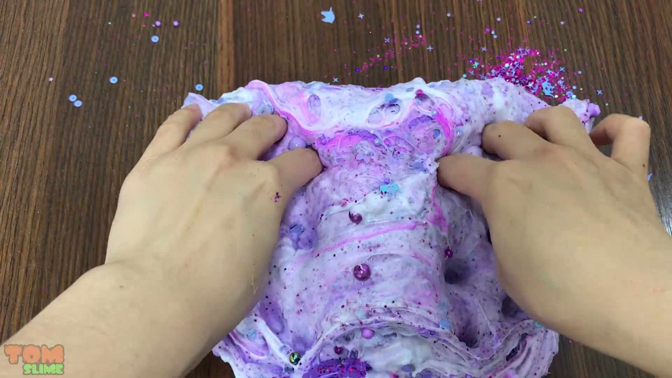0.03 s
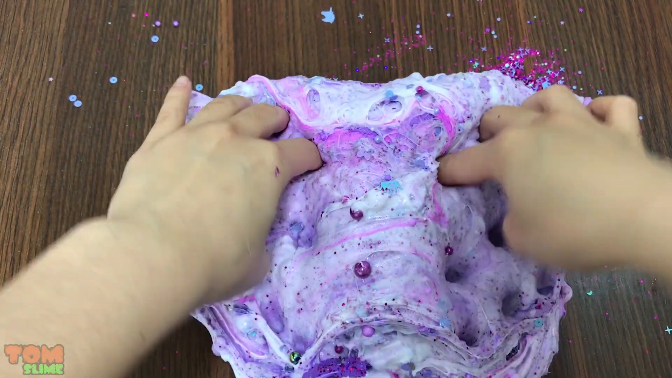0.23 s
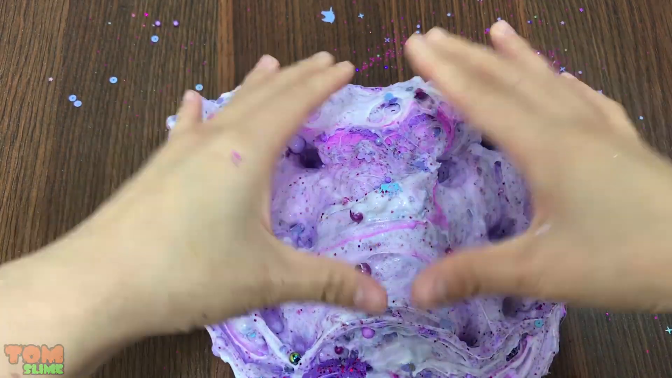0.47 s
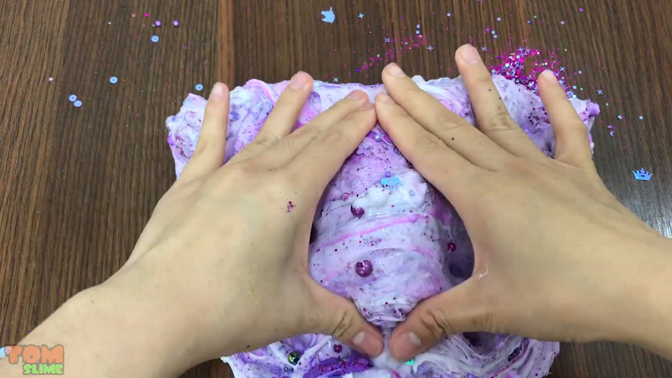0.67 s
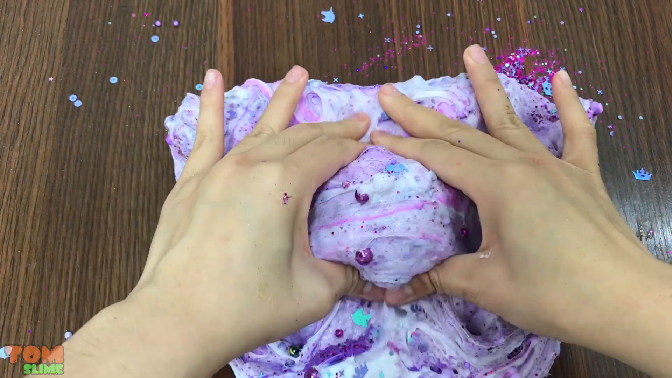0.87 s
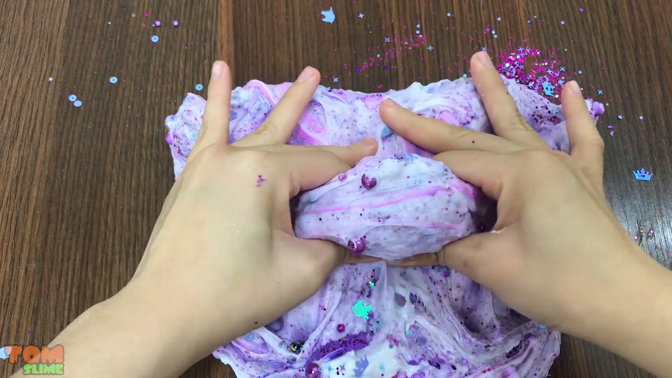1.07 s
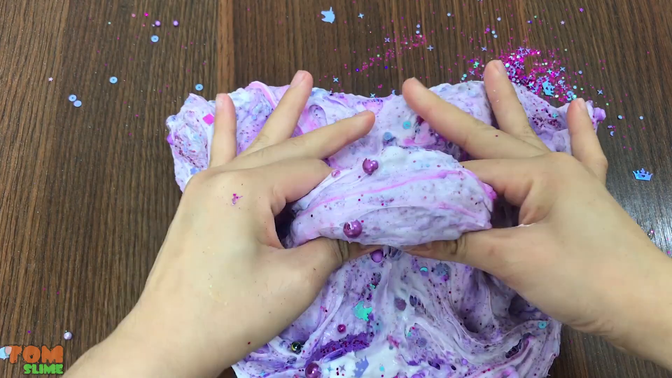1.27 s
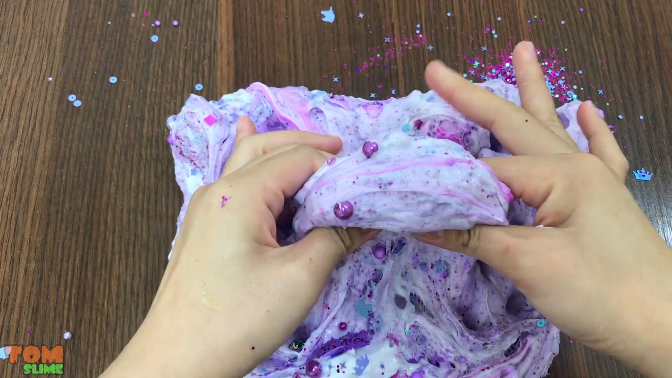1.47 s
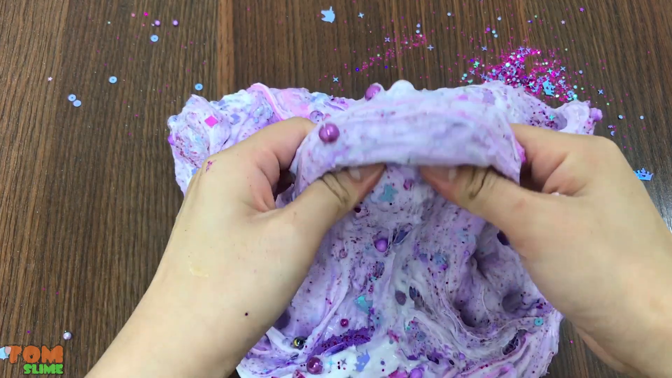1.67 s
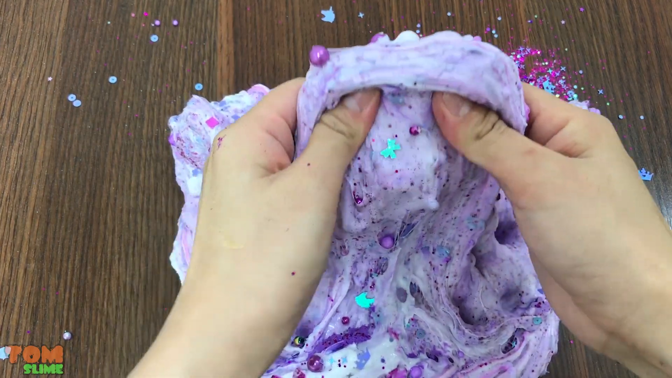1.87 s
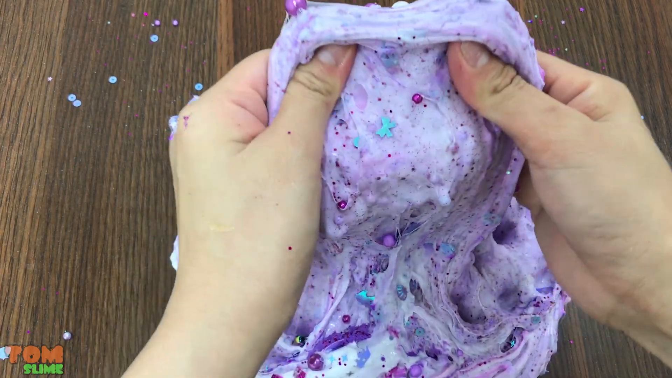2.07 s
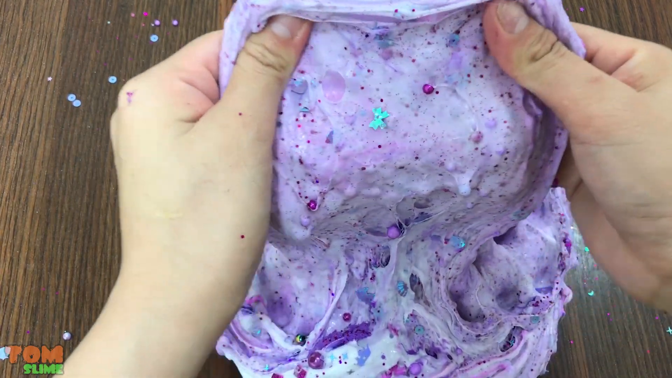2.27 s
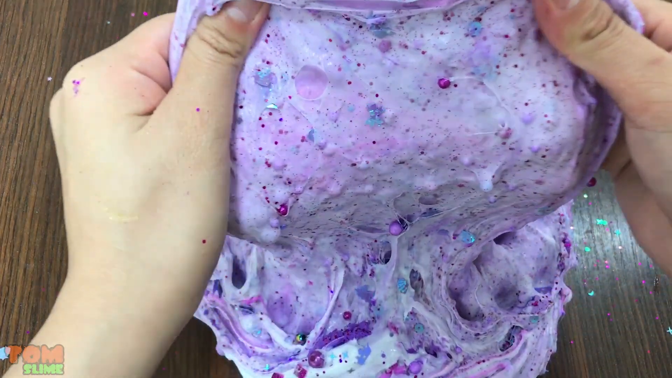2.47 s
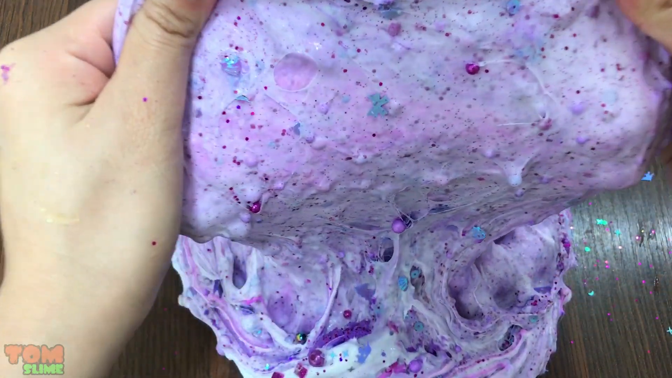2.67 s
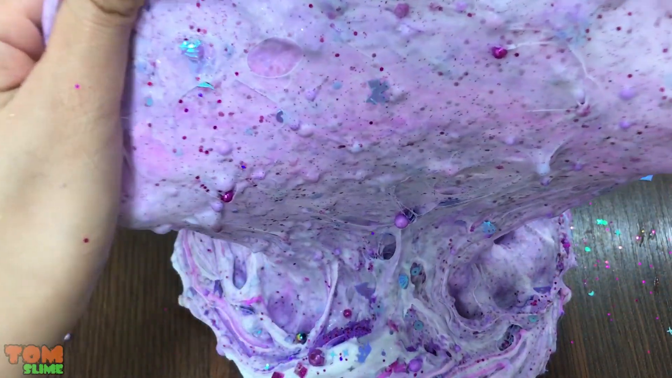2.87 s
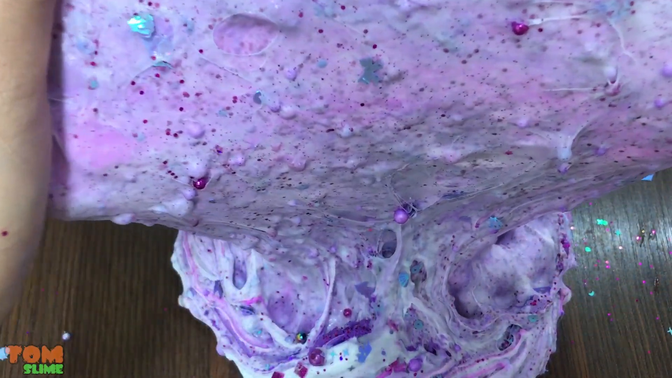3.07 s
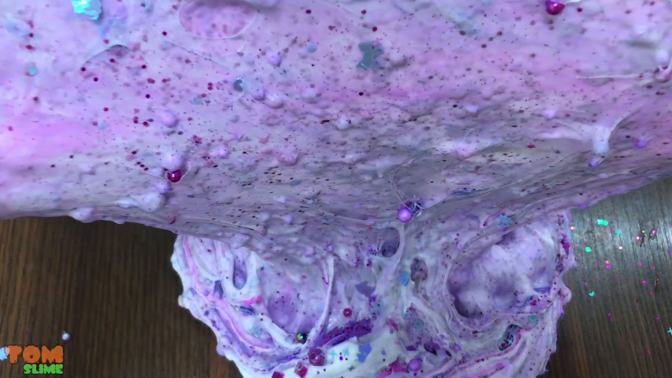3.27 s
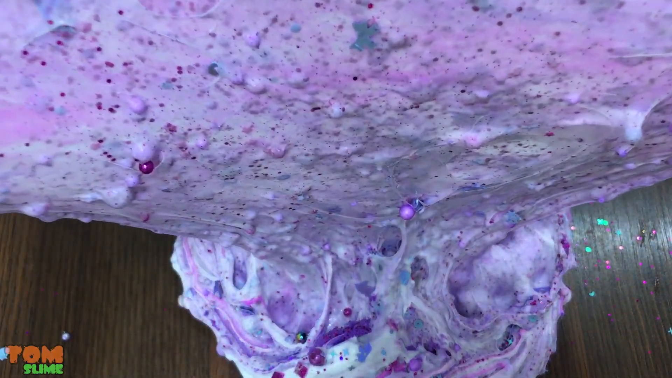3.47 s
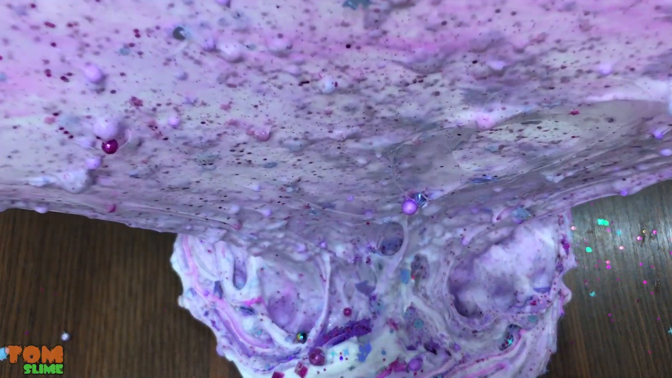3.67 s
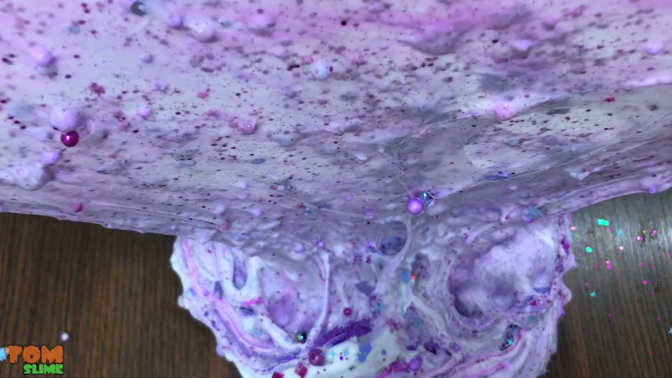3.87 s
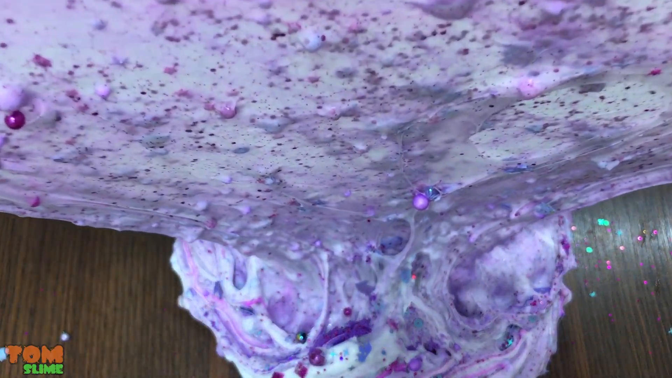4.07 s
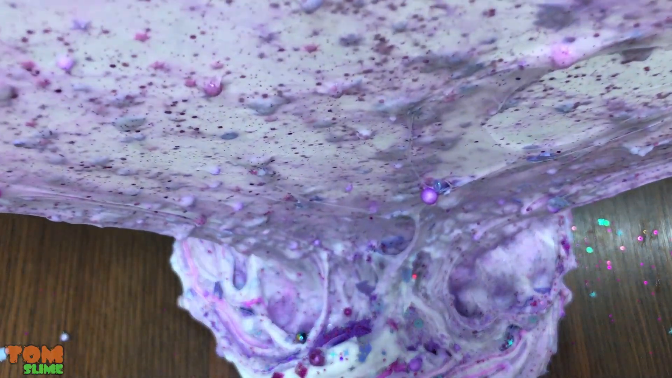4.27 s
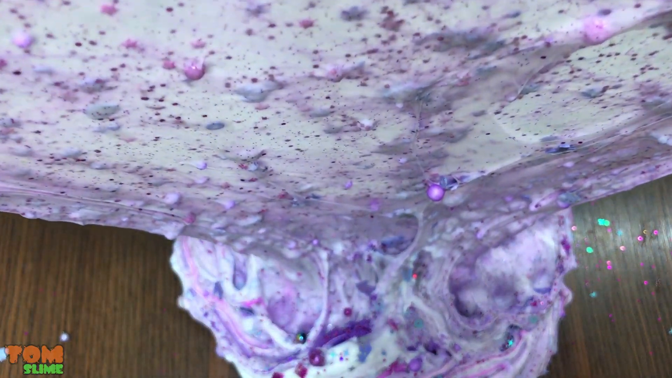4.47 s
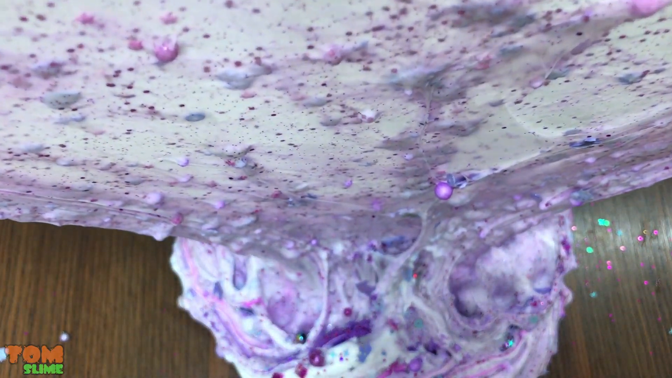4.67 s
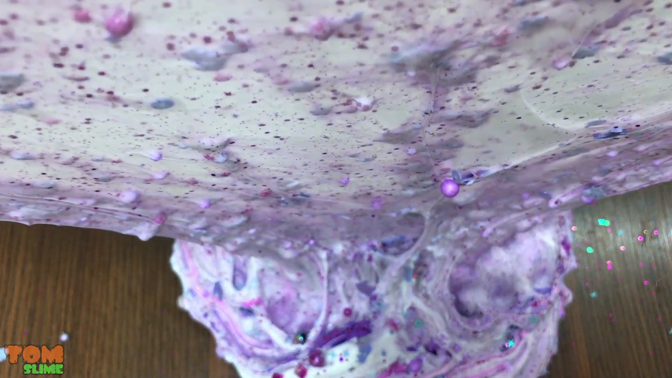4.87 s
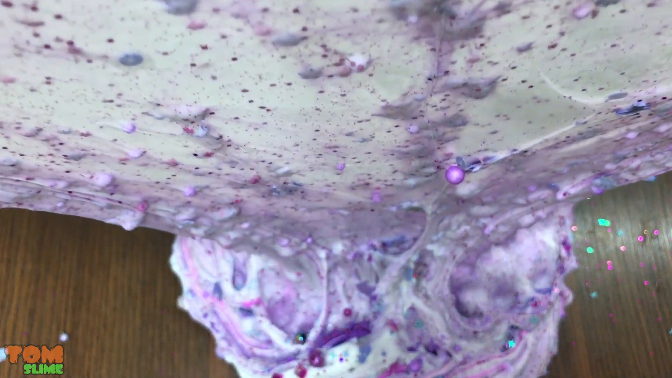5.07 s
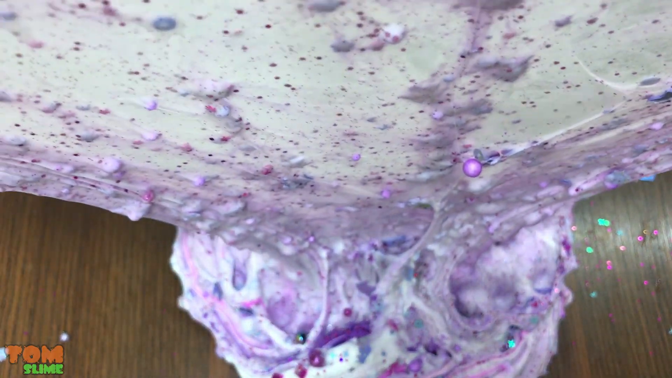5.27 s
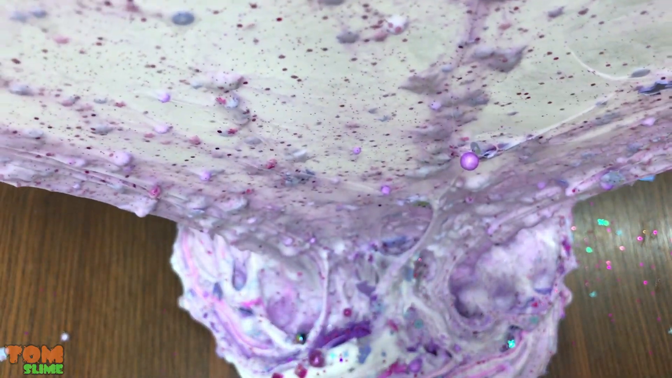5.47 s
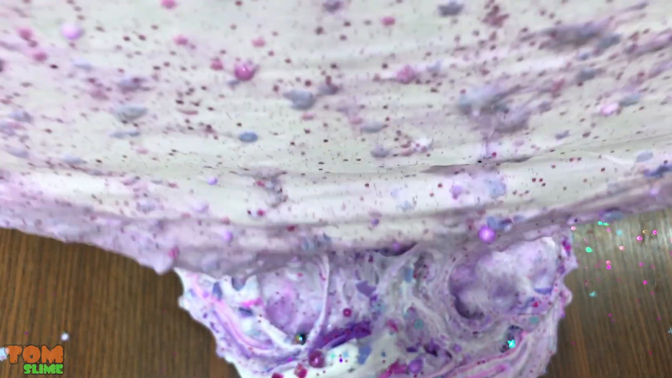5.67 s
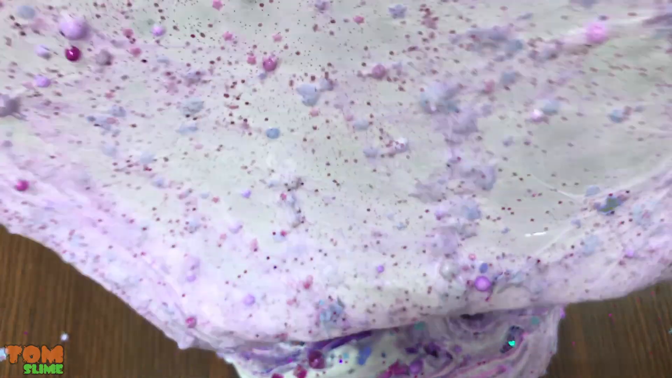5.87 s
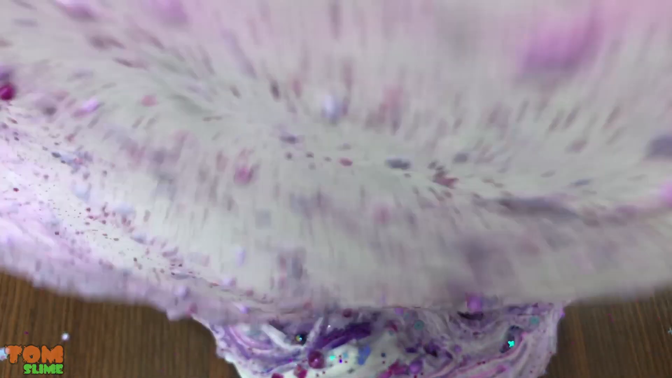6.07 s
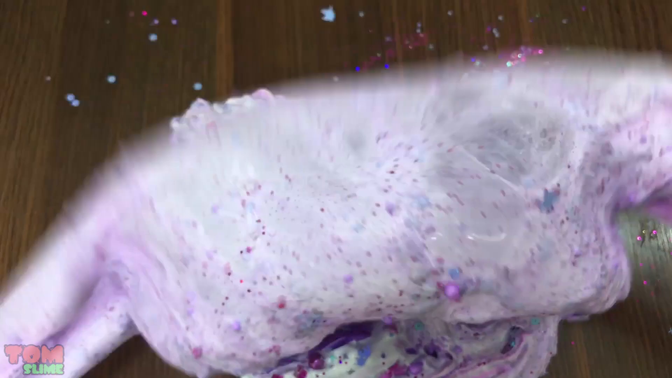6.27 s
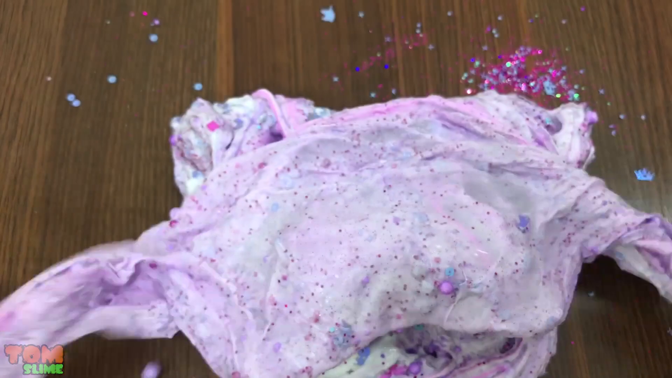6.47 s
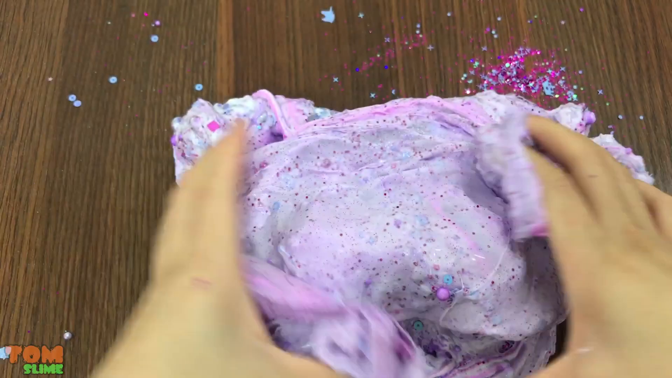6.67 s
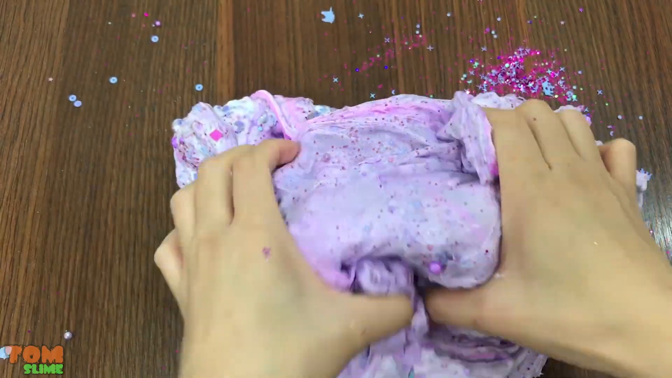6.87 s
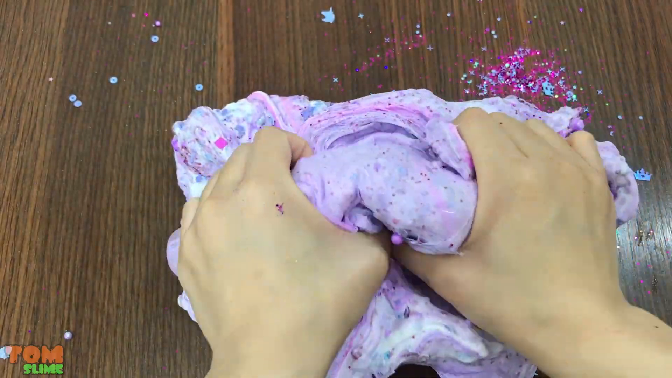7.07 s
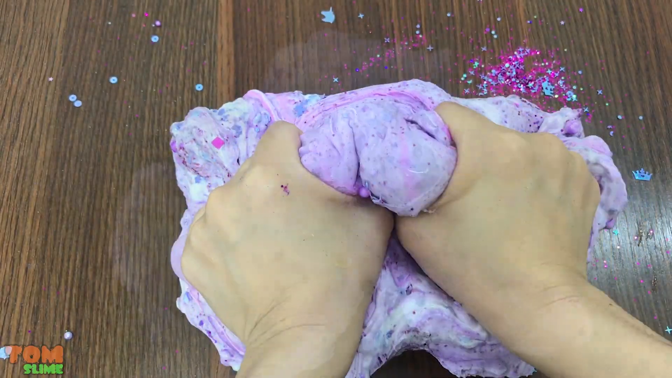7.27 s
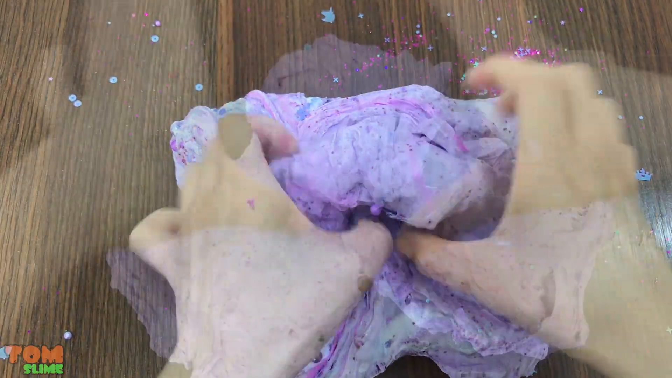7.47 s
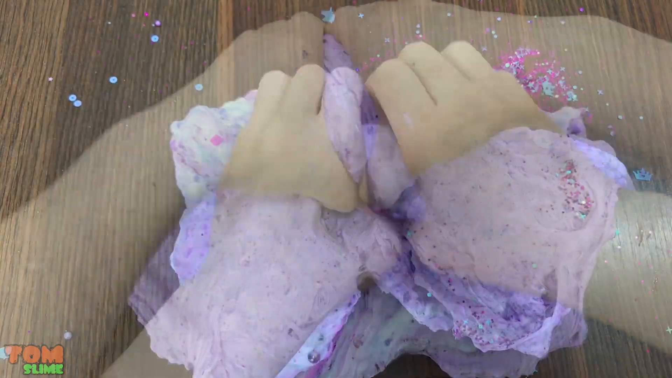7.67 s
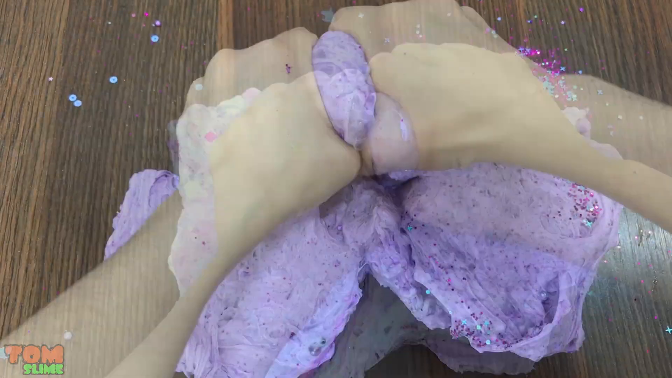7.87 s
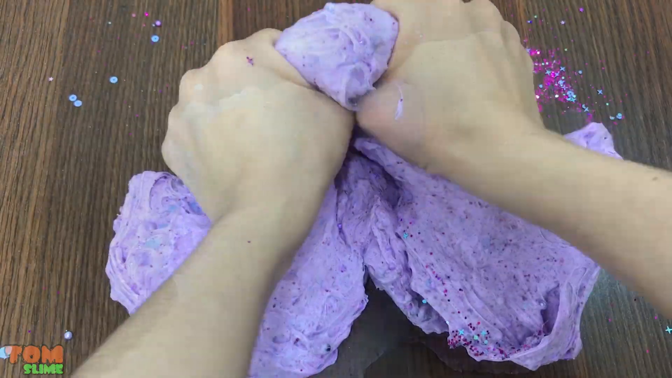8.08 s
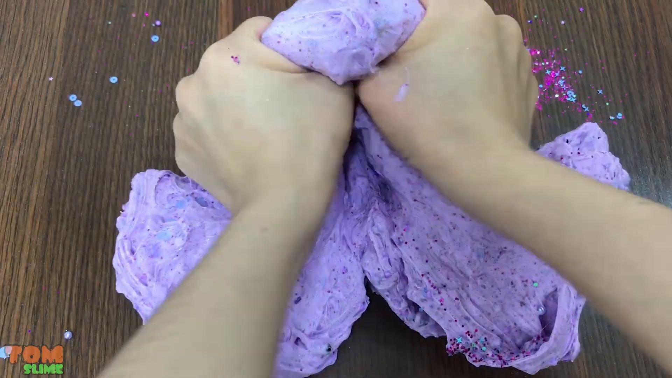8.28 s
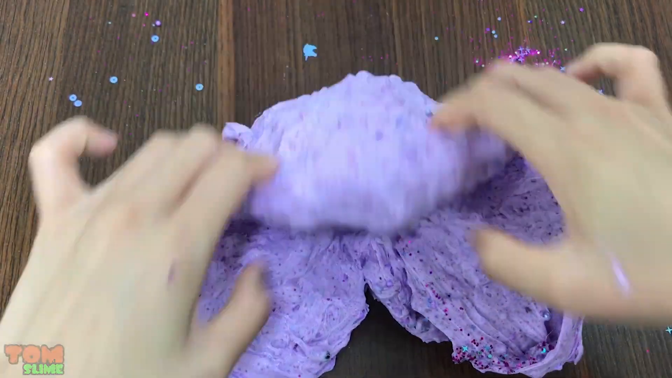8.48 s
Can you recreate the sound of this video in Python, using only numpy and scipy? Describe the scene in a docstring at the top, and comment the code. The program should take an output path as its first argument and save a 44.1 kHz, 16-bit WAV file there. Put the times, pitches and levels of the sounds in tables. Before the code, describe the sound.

Close-up slime squeezing with fine bubble crackle, a quiet stretch, a swishing drop with a heavy thud, then sharp squelchy popping.

```python
"""Kneading sticky slime

Hands squeeze, stretch and fold a big lump of slime on a wooden table, close to the microphone in a small room.
Air pockets burst as a torn film plus a ringing cavity; tiny bubbles crackle as clumped, pitched clicks.
Fingers squelch through coloured bubble noise; low thumps and bumps ring the table's low modes.
Pulled into a thin sheet the slime falls almost silent, amid soft low rustles, perhaps of clothing or a chair;
then it swishes down and is squeezed until the trapped air pops."""
import sys
import numpy as np
from scipy import signal
from scipy.fft import rfft, irfft, next_fast_len
from scipy.io import wavfile
from scipy.ndimage import uniform_filter1d

SR = 44100
rng = np.random.default_rng(int(sys.argv[2]) if len(sys.argv) > 2 else 0)


def unload_wav(signal):
    """Save mono or channel-first audio to the path in sys.argv[1] as 16-bit WAV at rate SR, clipped to [-1, 1]."""
    wavfile.write(
        sys.argv[1],
        SR,
        np.round(np.clip(np.atleast_2d(signal).T, -1, 1) * 32767).astype(np.int16),
    )


N = 375732   # samples


def from_db(db):
    """Amplitude gain from decibels."""
    return 10 ** (np.asarray(db) / 20)


def rms_one(x):
    """Normalise the mean power: scale to rms 1."""
    return x / np.sqrt(np.mean(x ** 2) + 1e-20)


def unit_energy(x):
    """Normalise the total energy to that of a unit click."""
    return x / np.sqrt(np.sum(x ** 2) + 1e-20)


def in_time(rows):
    """Linear interpolation in time: one curve for each column after the first."""
    s, *columns = np.transpose(rows)
    return [np.interp(np.arange(N) / SR, s, column) for column in columns]


def at_hz(points, hz):
    """Interpolation on a log-frequency axis."""
    f, value = np.transpose(points)
    return np.interp(np.log(np.maximum(hz, 1)), np.log(f), value)


def add(out, start_s, sound):
    """Superposition: mix a sound in at its start time."""
    i = max(round(start_s * SR), 0)
    out[i:i + len(sound)] += sound[:N - i]


def drift(knots_per_s):
    """Slow random modulation: interpolated Gaussian knots, rms 1."""
    knots = rng.standard_normal(N // 40)
    return rms_one(np.interp(np.arange(N) / SR * knots_per_s, np.arange(len(knots)), knots))


def resonate(x, hz, q):
    """Damped resonance: a two-pole band-pass with gain 1 at its peak."""
    w = 2 * np.pi * min(hz, .45 * SR) / SR
    a = np.sin(w) / (2 * max(q, .2))
    return signal.lfilter([a, 0, -a], [1 + a, -2 * np.cos(w), 1 - a], x + 1e-18)


def colour(x, spectrum):
    """Causal minimum-phase filtering: folding the cepstrum onto positive time gives the phase; rms 1."""
    size = 2 * next_fast_len(N // 2 + 4096)
    gain = from_db(at_hz(spectrum, np.arange(size // 2 + 1) * SR / size))
    cepstrum = irfft(np.log(gain))
    cepstrum[size // 2:] = 0
    response = np.exp(2 * rfft(cepstrum))
    return rms_one(irfft(rfft(x, size) * response)[:N])


def hiss(spectrum):
    """Stationary coloured noise, rms 1."""
    return colour(rng.standard_normal(N), spectrum)


def swells(rows, rise_db_per_s, fall_db_per_s):
    """Incoherent addition of gestures (start_s, hold_s, level_db) that rise up to start_s, hold and fade."""
    t, power = np.arange(N) / SR, 1e-14
    for start_s, hold_s, level_db in rows:
        before = rise_db_per_s * np.maximum(start_s - t, 0)
        after = fall_db_per_s * np.maximum(t - start_s - hold_s, 0)
        power = power + from_db(level_db - np.minimum(before + after, 100)) ** 2
    return np.sqrt(power)


def microbubbles(per_s, spread_db, clump_db, low_hz, high_hz, q, snap):
    """Clustered random arrivals: each tiny bubble bursts with a snap and rings at one of 20 pitches."""
    chance = per_s * from_db(clump_db * drift(70)) / SR
    born = rng.random(N) < chance
    loudness = from_db(spread_db * np.minimum(rng.exponential(1, N), 4))
    clicks = born * loudness * rng.choice([-1, 1], N)
    pitches = np.geomspace(low_hz, high_hz, 20)
    dealt = rng.integers(0, len(pitches), N)
    rings = rms_one(sum(resonate(clicks * (dealt == k), hz, q) for k, hz in enumerate(pitches)))
    grains = rings + snap * rms_one(clicks)
    # even out the level over about 70 ms, so that only the texture is left
    return grains / np.sqrt(uniform_filter1d(grains ** 2, size=3000) + 1e-6)


# Shape of the background hiss and rumble. Columns: frequency_hz, relative_db_per_hz
FLOOR_SPECTRUM = [(15, -37), (25, 13), (59, -0.5), (166, -2), (531, -10), (1290, -14.5), (4250, -20.5),
                  (5140, -22.5), (6210, -21), (11000, -27), (12500, -24), (16000, -23.5)]


def background(level_db=-64.5):
    """Stationary noise: a faint hiss over a stronger low rumble."""
    return from_db(level_db) * hiss(FLOOR_SPECTRUM)


# Decay of the room. Columns: frequency_hz, t60_s
REVERB_TIME = [(150, 0.84), (530, .5), (1400, 0.72), (3700, 0.51), (9700, 0.67), (16000, 0.1)]
# Strength of the room's echo. Columns: frequency_hz, level_db
REVERB_LEVEL = [(100, -15.5), (400, -5), (1400, -7.5), (3700, -6.5), (7000, -9.5), (11000, -9.5),
                (16000, -18)]


def room(x, build_s=0.00057):
    """Diffuse reverberation: noise bands decay exponentially, the highest treble fastest."""
    t = np.arange(SR * 3 // 4) / SR
    edges = np.geomspace(60, 17000, 13)
    white, response = rng.standard_normal((2, len(t))), 0
    for k, (low, high) in enumerate(zip(edges, edges[1:])):
        hz = np.sqrt(low * high)
        # neighbouring bands draw on different noise
        band = signal.sosfilt(signal.butter(2, [low, high], "band", fs=SR, output="sos"), white[k % 2])
        decay = from_db(-60 * t / at_hz(REVERB_TIME, hz))
        tail = unit_energy(band * decay * (1 - np.exp(-t / build_s)))
        share = np.sqrt(2 * (high - low) / SR)   # of white noise in this band
        response = response + from_db(at_hz(REVERB_LEVEL, hz)) * share * tail
    return signal.fftconvolve(x, response)[:N]


def near_scatter(x, level_db=-9.0, spread_s=0.0016, lowest_hz=1500):
    """Early scattering: hands and table throw the short waves back within a few milliseconds."""
    t = np.arange(2048) / SR
    bounces = unit_energy(rng.standard_normal(len(t)) * t * np.exp(-2 * t / spread_s))
    bounces = signal.sosfilt(signal.butter(2, lowest_hz, "high", fs=SR, output="sos"), bounces)
    return from_db(level_db) * signal.fftconvolve(x, bounces)[:N]


# Dull noise of moving hands. Columns: frequency_hz, relative_db_per_hz
SHUFFLE_SPECTRUM = [(25, -9), (55, 7), (100, -3), (170, -5.5), (300, -5), (500, -20.5), (1000, -29)]


def shuffling(squelch_level, level_db=-65, medium_squelch_db=-57.5, follows=0.27):
    """Friction noise: dull movement of the hands follows a share of the squelch's swing in dB."""
    swing_db = squelch_level - medium_squelch_db
    return from_db(level_db + follows * swing_db) * hiss(SHUFFLE_SPECTRUM)


# Soft low rustles, perhaps of clothing or a chair. Columns: start_s, hold_s, level_db
SOFT_RUSTLES = [(4.15, 0.0056, -63.5), (5.206, 0.1, -51)]
# Low rumble. Columns: frequency_hz, relative_db_per_hz
RUMBLE_SPECTRUM = [(35, -6), (80, -4), (180, 2), (280, 0), (450, -13.5), (750, -19), (1400, -56)]
# Brighter rustle. Columns: frequency_hz, relative_db_per_hz
RUSTLE_SPECTRUM = [(150, 6.5), (400, 5.5), (750, 3), (1200, -6), (2000, -10), (4500, -21), (12000, -43)]


def soft_rustling(rise_db_per_s=227, rumble_fall_db_per_s=130, rustle_fall_db_per_s=220,
                  rustle_db=-5, rustle_lead_s=0.046, flutter_db=4.5):
    """Friction noise of soft movement: a brighter rustle leads and dies before a low rumble."""
    rumble = swells(SOFT_RUSTLES, rise_db_per_s, rumble_fall_db_per_s)
    ahead = [(s - rustle_lead_s, hold_s, db + rustle_db) for s, hold_s, db in SOFT_RUSTLES]
    rustle = swells(ahead, rise_db_per_s, rustle_fall_db_per_s) * from_db(flutter_db * drift(90))
    return rumble * hiss(RUMBLE_SPECTRUM) + rustle * hiss(RUSTLE_SPECTRUM)


# Fall of the sheet through the air. Columns: start_s, hold_s, level_db
SHEET_FALLS = [(6.135, 0.059, -53)]
# Noise of the moving air. Columns: frequency_hz, relative_db_per_hz
SWISH_SPECTRUM = [(35, 25), (80, 20), (200, 12), (500, -6), (1500, 0.5), (4000, -0.5), (9000, -5),
                  (16000, -10)]


def falling(rise_db_per_s=900, fall_db_per_s=80, push_hz=500, push_lag_s=.055):
    """Flow noise: the dropping sheet swishes at once; the deep push of air follows as it nears the table."""
    t, swish = np.arange(N) / SR, hiss(SWISH_SPECTRUM)
    gain = swells(SHEET_FALLS, rise_db_per_s, fall_db_per_s)
    deep = signal.sosfilt(signal.butter(3, push_hz, "low", fs=SR, output="sos"), swish)
    bright = signal.sosfilt(signal.butter(3, push_hz, "high", fs=SR, output="sos"), swish)
    late_gain = np.interp(t - push_lag_s, t, gain)
    return gain * bright + late_gain * deep


# A long stretch makes the thinning sheet creak. Columns: start_s, hold_s, level_db
LONG_STRETCHES = [(2.8, 1.18, -76.5)]


def straining(rise_db_per_s=80, fall_db_per_s=70):
    """Fracture noise: strands give way inside the stretched sheet, all at much the same pitch."""
    strands = microbubbles(per_s=450, spread_db=9.0, clump_db=3.5, low_hz=980, high_hz=1410, q=9.0, snap=.05)
    return swells(LONG_STRETCHES, rise_db_per_s, fall_db_per_s) * strands


# Low thumps and bumps on the table. Columns: start_s, level_db, contact_ms
THUMPS = [(0.361, -41, 2.5), (0.396, -37.5, 1.8), (0.446, -37, 2.6), (0.486, -38, 4.3), (6.361, -25, 0.89),
          (6.368, -16.5, 4.6), (6.396, -31.5, 1.4), (6.427, -33, 2.2), (6.985, -37, 1.6), (7.516, -44, 3.0),
          (7.618, -37.5, 2.6), (7.737, -57.5, 1.1), (8.41, -39, 3.2), (8.462, -30, 7)]
# Modes of the table under the slime. Columns: pitch_hz, typical_level_db, t60_s
TABLE_MODES = [(55, -13.5, .25), (74.8, -14, 0.23), (98.2, -1, 0.13), (167, 0.5, 0.12), (227.5, -11, 0.21),
               (307, -6, 0.12), (392, -21, .07)]


def table_thumps():
    """Modal excitation: each push rings the table's low modes; longer contacts sound duller."""
    out, t = np.zeros(N), np.arange(SR // 2) / SR
    for start_s, level_db, contact_ms in THUMPS:
        push = t * np.exp(-t * 2000 / max(contact_ms, .2))
        ring = 0
        for hz, mode_db, t60_s in TABLE_MODES:
            decay = from_db(mode_db + rng.normal(0, 3.3) - 60 * t / t60_s)   # each thump weights the modes anew
            ring = ring + decay * np.cos(2 * np.pi * hz * t)
        add(out, start_s, from_db(level_db) * signal.fftconvolve(ring, push / push.sum())[:len(t)])
    return out


# Fingers press, squeeze or peel. Columns: start_s, hold_s, relative_squelch_db, relative_crackle_db
FINGER_STROKES = [(0.357, 0.044, -51, -48), (0.398, 0.0099, -37, -38.5), (0.718, .01, -46, -51),
                  (0.858, 0.074, -49, -56), (1.933, .09, -58.5, -53.5), (2.115, .06, -64, -54.5),
                  (2.252, .14, -65, -59), (2.53, .05, -72, -77), (4.964, 0.15, -66, -81),
                  (5.18, 0.078, -70, -67.5), (5.43, 0.19, -79, -69.5), (5.826, 0.0082, -68, -61.5),
                  (6.395, 0.0052, -36.5, -38.5), (6.537, 0.098, -53, -46), (6.75, 0.03, -52, -41),
                  (6.957, 0.064, -40, -35.5), (7.102, .03, -46, -39), (7.228, 0.024, -42, -37),
                  (7.341, 0.053, -40, -30.5), (7.504, 0.061, -38.5, -34.5), (7.795, 0.076, -50.5, -51.5),
                  (8.03, 0.15, -56, -50), (8.212, 0.027, -49.5, -55), (8.394, 0.102, -41.5, -39)]
# Level of the idle crackle between strokes. Columns: time_s, relative_crackle_db
IDLE_CRACKLE = [(0, -57), (.2, -69), (.33, -54.5), (.6, -78), (.8, -55), (1.2, -55.5), (1.5, -63.5),
                (2.6, -59.5), (3.2, -68), (4.1, -70), (4.45, -74.5), (4.85, -71), (5.35, -78), (6.2, -80),
                (6.5, -57.5), (7.7, -52.5), (8.0, -58.5), (8.5, -62)]


def effort(press_db_per_s=544, let_go_db_per_s=280, idle_squelch_db=-4.5):
    """Power addition of finger strokes and idle crackle: levels in dB of squelch and crackle."""
    idle, = in_time(IDLE_CRACKLE)
    wet_rows = [(s, hold_s, wet_db) for s, hold_s, wet_db, _ in FINGER_STROKES]
    fine_rows = [(s, hold_s, fine_db) for s, hold_s, _, fine_db in FINGER_STROKES]
    wet = swells(wet_rows, press_db_per_s, let_go_db_per_s)
    fine = swells(fine_rows, press_db_per_s, let_go_db_per_s)
    squelch_level = 20 * np.log10(np.hypot(wet, from_db(idle + idle_squelch_db)))
    crackle_level = 20 * np.log10(np.hypot(fine, from_db(idle)))
    return squelch_level, crackle_level


# Wet squelch. Columns: frequency_hz, relative_db_per_hz
SQUELCH_SPECTRUM = [(120, -13), (250, 4), (400, 1.5), (750, -5), (1200, -0.5), (2000, 0), (2800, -21),
                    (5000, -13)]
# Fine crackle. Columns: frequency_hz, relative_db_per_hz
CRACKLE_SPECTRUM = [(1300, -60.5), (2300, 4.5), (3200, 6.5), (4500, 2.5), (7000, 0), (9000, -1.5),
                    (11000, -5), (13000, 3.5), (16000, -3)]


def kneading(squelch_level, crackle_level, squelch_db=-2.0, crackle_db=-2.0, wet=0.7):
    """Event density: light touches free single bubbles, firm fingers a dense, sticky fizz; skin rubs beneath."""
    firm = np.clip((crackle_level + 55.5) / 18, 0.05, .95)
    sparse = microbubbles(per_s=500, spread_db=6.5, clump_db=6.0, low_hz=540, high_hz=14500, q=12.0, snap=0.99)
    dense = microbubbles(per_s=3000, spread_db=3.8, clump_db=4.5, low_hz=350, high_hz=14500, q=4.0, snap=.35)
    rub = .45 * rng.standard_normal(N)
    grains = np.sqrt(1 - firm) * sparse + np.sqrt(firm) * dense + rub
    # larger, wetter bubbles make the squelch lumpy
    blips = microbubbles(per_s=300, spread_db=1.0, clump_db=3.0, low_hz=359, high_hz=3500, q=6.4, snap=0.045)
    squelch = rms_one(colour(grains, SQUELCH_SPECTRUM) + wet * colour(blips, SQUELCH_SPECTRUM))
    crackle = colour(grains, CRACKLE_SPECTRUM)
    return from_db(squelch_level + squelch_db) * squelch + from_db(crackle_level + crackle_db) * crackle


# Air pockets big enough to be heard singly; the thump is that of the lump around them. Columns: start_s,
# relative_tear_ms, film_db, film_hz, film_q, relative_pocket_db, pocket_hz, relative_thump_db
AIR_POCKETS = [(0.008, 0.93, -7.5, 6600, 4, -42, 4540, -55),
               (0.2875, 2.6, -25, 6000, 0.49, -35.5, 2730, -60),
               (0.3477, 17, -11, 10900, .57, -42, 1920, -26),
               (0.3675, 6, -14.5, 4030, 0.22, -18.5, 1700, -15),
               (0.4015, 3.7, -27, 1900, .8, -36, 1120, -15), (0.4301, 0.29, -18, 6100, .64, -26, 870, -16),
               (0.6721, .5, -27, 12000, .53, -37, 5000, -60), (0.6974, 0.16, -7, 1390, 1.3, -25, 450, -11),
               (0.7027, 0.65, -0.5, 3900, 1.4, -11, 1200, -16),
               (0.7178, 0.17, -7.5, 1430, 1.6, -8, 2520, -44),
               (0.7665, .3, -17, 4000, 0.58, -32, 3210, -46),
               (0.804, 0.19, -7.5, 5940, 4.4, -16, 2960, -28),
               (0.829, .2, -13, 13400, 0.37, -19, 5430, -36),
               (0.8454, 1.2, -6, 10700, 0.24, -19, 3070, -43), (0.8543, .3, -16, 10400, .5, -15, 3550, -26),
               (0.8604, .8, -27, 1100, .5, -17, 1250, -26),
               (0.8844, 0.39, -1.5, 4560, 0.46, -10, 4300, -15),
               (1.0097, .3, -22.5, 13400, 3.3, -21.5, 2780, -43),
               (1.061, 1.2, -20, 1890, 0.73, -33, 2330, -27.5),
               (1.0991, 0.31, -19, 5230, 0.52, -20.5, 3060, -44),
               (1.1643, 0.46, -26.5, 8900, .31, -29, 2380, -47),
               (1.2065, 1.8, -26, 4000, 0.44, -24, 560, -29),
               (1.2125, 0.24, -24, 13400, 2.3, -31, 2650, -25),
               (1.3333, 1.6, -15.5, 1240, 3.7, -14.5, 510, -22.5),
               (1.5508, 2.7, -27, 7500, 0.55, -50, 2970, -47),
               (1.6883, 2.5, -37, 9400, 1.1, -29, 1670, -32),
               (1.7596, 0.44, -17, 13300, 0.41, -17, 1470, -55),
               (2.0299, 0.26, -20, 10100, 3.1, -28, 1410, -53), (2.0383, 2, -20, 3880, 1.6, -21, 1430, -32),
               (2.2039, 1.0, -27, 13400, 3.6, -50, 1430, -57),
               (2.326, 0.48, -30, 4400, 1.1, -36, 1350, -50), (2.3902, 3.8, -31, 1800, 2.2, -26, 2950, -57),
               (2.4106, .6, -24.5, 13300, 0.41, -59, 450, -60),
               (2.4254, 0.43, -26, 7500, 0.71, -48, 1040, -58),
               (2.4657, 1.2, -25.5, 1700, 0.71, -40, 2680, -44),
               (2.5137, 0.077, -10.5, 2530, 1.6, -26, 460, -48),
               (2.523, 1.6, -25, 2500, 0.83, -27, 1030, -40), (2.8942, .42, -30, 2970, 2.7, -40, 1150, -38),
               (2.9357, 9.4, -29.5, 13400, 0.19, -31.5, 2710, -62),
               (3.2684, 0.22, -27, 7200, 2.5, -42, 1190, -59),
               (3.3148, .2, -33, 13400, 0.64, -39, 5200, -49),
               (3.6637, 0.16, -23, 6100, 5, -23.5, 4350, -58), (3.777, 4.5, -31, 1150, 2.2, -44, 3220, -35),
               (3.934, .4, -36, 5500, 0.77, -46, 2500, -60), (3.954, .4, -36, 4500, .76, -43, 2300, -60),
               (4.148, 2.5, -35.5, 1700, .6, -52, 2800, -40),
               (4.3723, 0.88, -33, 2360, 4.8, -32.5, 4360, -54),
               (4.63, 0.36, -38, 10000, .6, -55, 5970, -60), (6.3604, 7.3, -4, 7600, 0.15, -4, 1050, 3),
               (6.365, 6.6, -4, 2480, 1.1, -5.5, 980, -28), (6.3953, 1.1, -8.5, 2400, 1, -13, 1030, -21),
               (6.4315, 2.8, -28, 2500, 0.85, -29, 1120, -32),
               (6.4815, 3.4, -10.5, 11400, 1.2, -24, 2500, -34),
               (6.5812, 2.3, 8, 5800, 0.31, -8.5, 2540, -27),
               (6.7344, 2.25, 4.5, 8160, 0.2, -11.5, 2100, -22),
               (6.8366, 1.2, -18.5, 1760, 1.2, -18, 3180, -46),
               (6.8579, .3, -28, 1500, 3.1, -14, 3380, -47), (6.9109, 2.8, 3.5, 8560, 0.27, -9, 2460, -40),
               (6.9745, 1.9, -11, 2500, 1.2, -15, 1530, -36), (6.9825, .6, -13, 3500, 1.0, -14, 2300, -23),
               (7.0419, .2, -7.5, 4130, 2, -6, 2110, -18), (7.0709, 1.7, 3, 5900, 0.71, -21, 650, -32),
               (7.078, .2, -5.5, 5370, 0.29, -22, 1200, -23),
               (7.1415, .28, -9.5, 3500, 3.7, -16, 1340, -17), (7.147, 3.4, 0.5, 1080, 2.3, -7.5, 1460, -3),
               (7.2027, 1.7, -6, 1290, 2.6, -12, 840, -41), (7.2209, 1.8, 3.5, 7100, 0.7, -20, 1750, -33),
               (7.2555, 1.5, -21, 1500, 1.5, -15, 900, -31), (7.2782, 1.7, 10, 7060, 7.8, -1, 1320, -15),
               (7.2808, 1.8, 11, 9400, 0.58, -5.5, 1960, 0), (7.3114, 1.7, -1, 9300, 1.5, -30, 1300, -31),
               (7.3295, 0.47, 9.5, 6660, 1.9, 1, 3250, -7), (7.3316, 1, 9.5, 4700, 2.9, -14, 940, -4.5),
               (7.3581, 2, 4, 10100, .35, -19, 1710, -10), (7.384, 0.98, 7.5, 1680, .67, 0.5, 3760, -11),
               (7.4863, 2.3, 2.5, 4630, 0.61, -14, 5600, -17),
               (7.716, .8, -44, 6800, 3.3, -20.5, 2030, -35),
               (7.7255, 3.3, -20.5, 13500, 0.26, -43, 1730, -43),
               (7.782, 1.3, -23, 10900, 0.36, -22.5, 2650, -54),
               (7.7974, 3.2, -26, 6900, 2.3, -19.5, 1420, -39),
               (7.8124, 0.31, -23, 10400, 3.3, -18, 2650, -39),
               (7.8655, 2.1, -14, 2470, 1.5, -18.5, 1220, -37),
               (7.902, 3.8, -16, 2400, 1.2, -25, 1410, -22), (7.9597, .3, -16, 2140, 2.8, -26, 3760, -50),
               (7.966, 2.6, -21, 1400, .83, -23, 4290, -40),
               (7.9758, 0.21, -21.5, 2880, 1.5, -33, 1200, -32),
               (8.0168, 3.5, -20, 9400, .9, -46, 1750, -27), (8.061, 2.1, -20, 5800, 1.3, -25, 4160, -31),
               (8.1254, 2.8, -12.5, 8300, 0.62, -24, 1110, -25),
               (8.1288, 3, -7, 13400, 0.43, -23, 3930, -17), (8.1495, 3.8, -22, 12400, 3.3, -12, 1320, -46),
               (8.1988, 0.31, 3.5, 6030, 1.3, -13, 1080, -15),
               (8.2012, 0.23, 10.5, 10900, 1.17, -2, 4400, -31), (8.398, 5, -16, 2500, 0.41, -20, 555, -21)]


def pops(film_db=0.0, pocket_db=1.0, thump_db=-2.5, first_snap=0.54, tear_scale=1.51, ragged_db=6.5,
         pocket_q=5.3, lump_hz=375, lump_q=3.15, count=4):
    """Cavity resonance: the film snaps and rips, the opened pocket rings and the lump thumps.
    Returns the sound aimed at the microphone and the sound radiated all round from a few spots on the slime."""
    aimed, spots, t = np.zeros(N), np.zeros((count, N)), np.arange(2048) / SR
    click = 1. * (t == 0)
    lump = unit_energy(resonate(click, lump_hz, lump_q))
    for k, row in enumerate(AIR_POCKETS):
        start_s, tear_ms, film_level, film_hz, film_q, pocket_level, pocket_hz, thump_level = row
        tear_ms = max(tear_ms, .1)
        grain, knots = rng.standard_normal((2, len(t)))
        fits = np.interp(np.arange(len(t)) / 20, np.arange(len(t)), knots)   # the rip goes in fits and starts
        fade = np.exp(-t * 1000 / (tear_scale * tear_ms))
        rip = np.sqrt(tear_ms) * unit_energy(grain * from_db(ragged_db * fits) * fade)
        tear = first_snap * click + rip   # a short tear is little more than one clean snap
        pocket = from_db(pocket_level + pocket_db) * unit_energy(resonate(click, pocket_hz, pocket_q))
        hollow = pocket + from_db(thump_level + thump_db) * lump
        # summed over all directions, the rip's ragged spectrum evens out
        for out, push in (aimed, tear), (spots[k % count], click):
            film = from_db(film_level + film_db) * unit_energy(resonate(push, film_hz, film_q))
            add(out, start_s, hollow + film)
    return aimed, spots


# Share of the sound that reaches the room, lower while the slime is lifted close to the microphone.
# Columns: time_s, level_db
ROOM_SHARE = [(0, -2.5), (1.4, -2), (2.0, 3), (2.5, -7.5), (5.8, -6), (6.35, 1), (8.52, -1.5)]


def scene():
    """Superposition of direct and reflected sound: each spot reaches the walls by paths of its own."""
    squelch_level, crackle_level = effort()
    aimed, spots = pops()
    body = kneading(squelch_level, crackle_level) + straining() + table_thumps()
    far = from_db(in_time(ROOM_SHARE)[0])
    echoes = near_scatter(aimed) + sum(room(x * far) for x in [body, *spots])
    movement = shuffling(squelch_level) + soft_rustling() + falling()
    return (aimed + body + echoes + movement + background())[None]


def record(dry, low_cut_hz=40, cutoff_hz=16200):
    """Band limiting and overload: deepest rumble removed, peaks beyond full scale clipped, top cut."""
    lean = signal.sosfilt(signal.butter(4, low_cut_hz, "high", fs=SR, output="sos"), dry)
    clipped = np.clip(lean, -1, 1)
    return signal.sosfilt(signal.ellip(10, .2, 80, cutoff_hz, fs=SR, output="sos"), clipped)


dry = scene()
out = record(dry)
unload_wav(out)
```